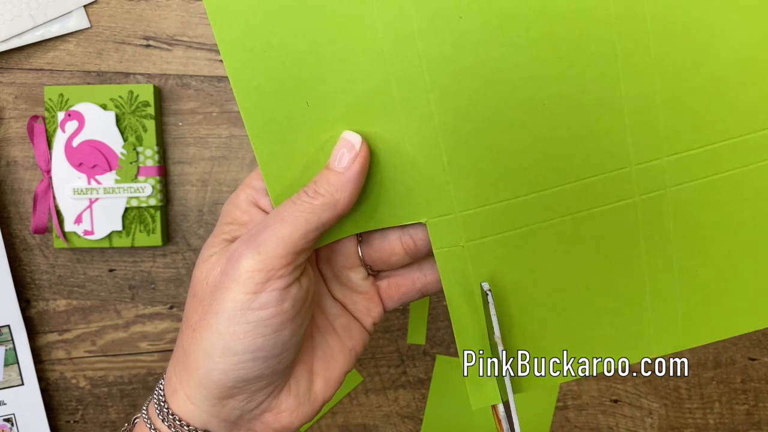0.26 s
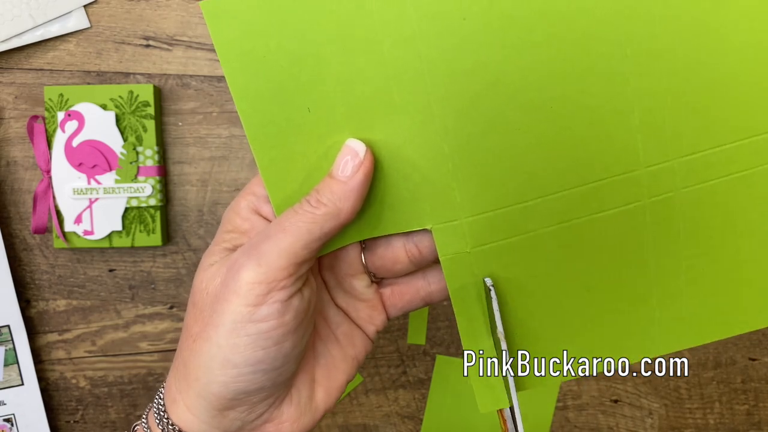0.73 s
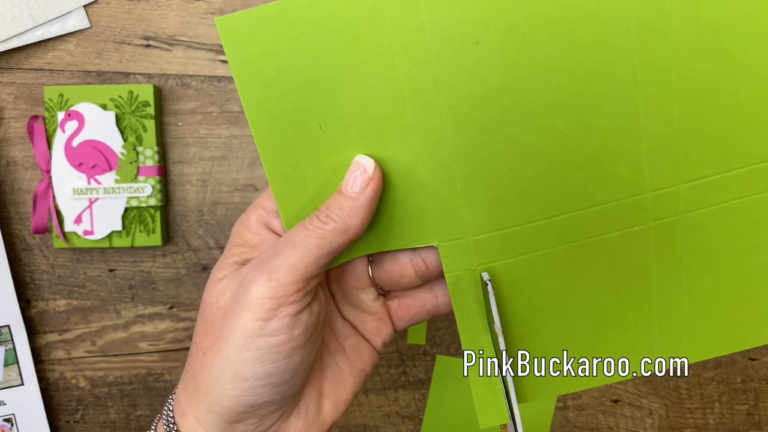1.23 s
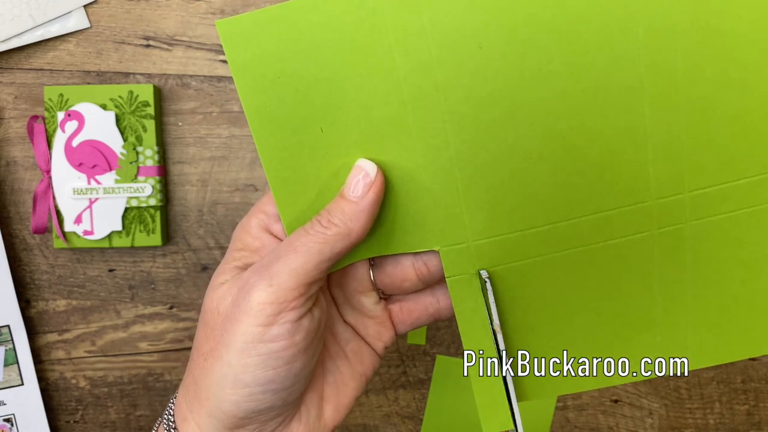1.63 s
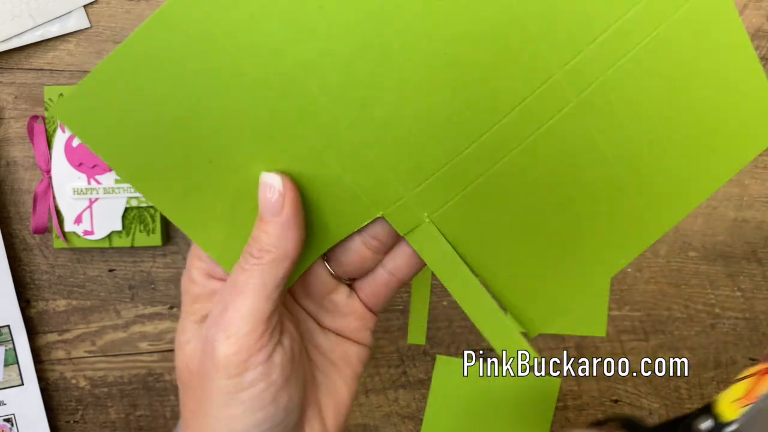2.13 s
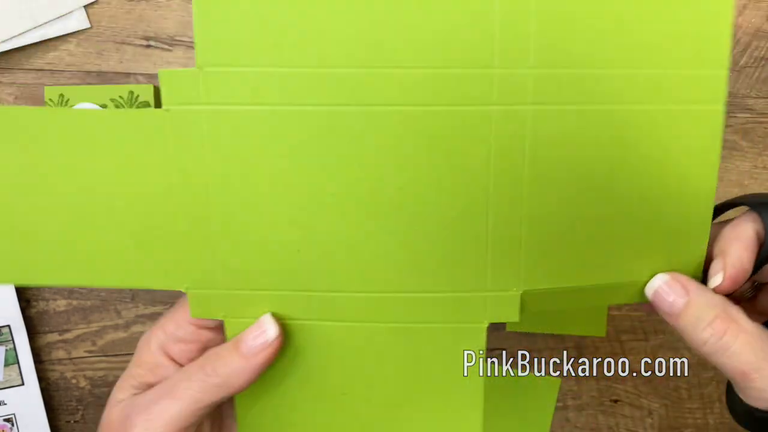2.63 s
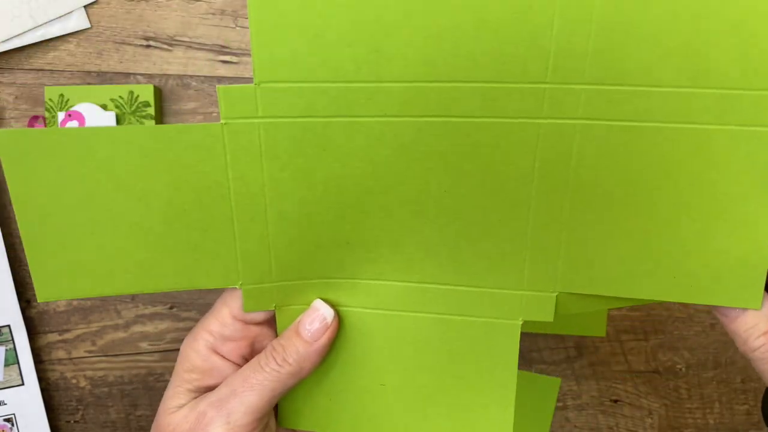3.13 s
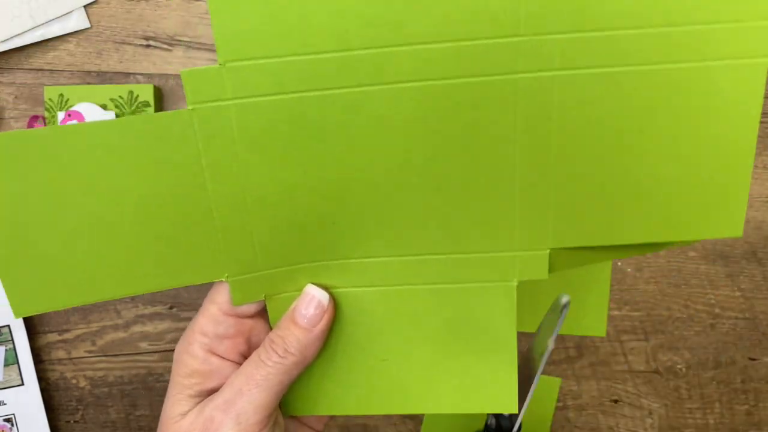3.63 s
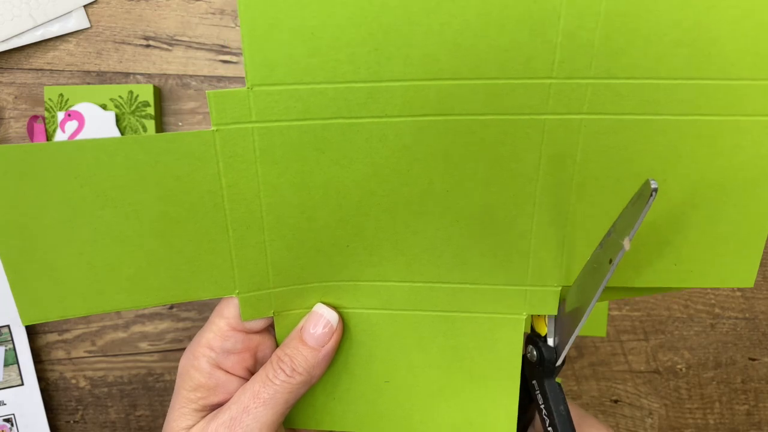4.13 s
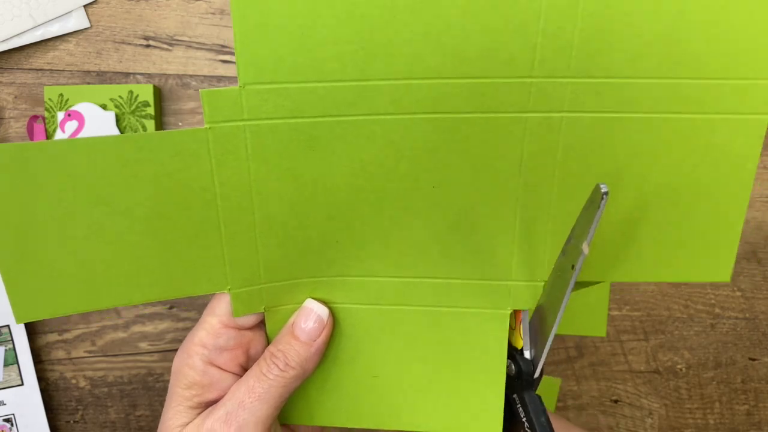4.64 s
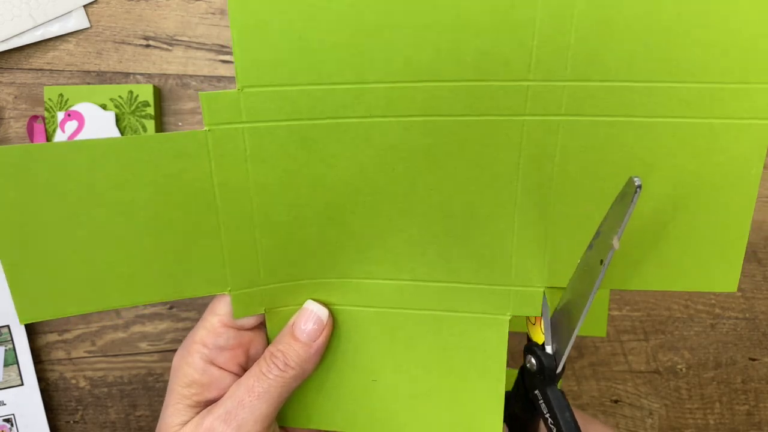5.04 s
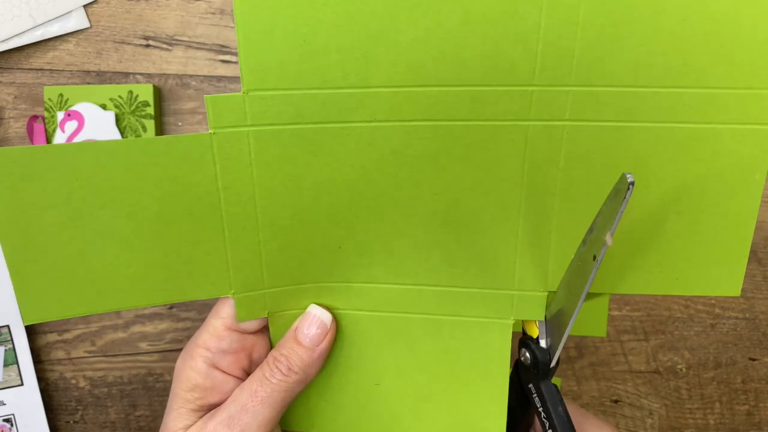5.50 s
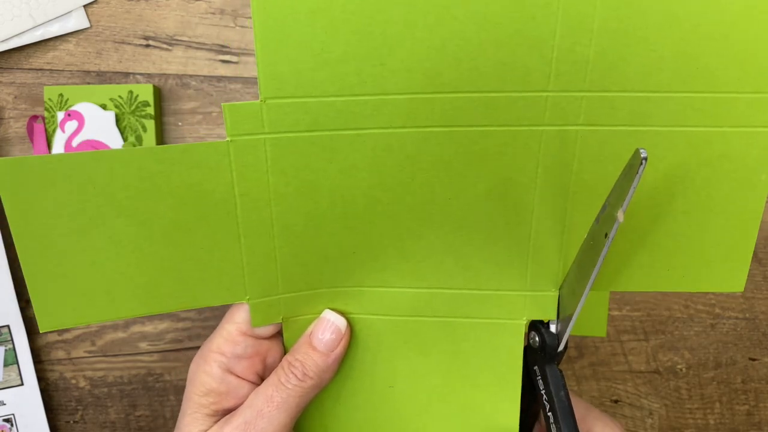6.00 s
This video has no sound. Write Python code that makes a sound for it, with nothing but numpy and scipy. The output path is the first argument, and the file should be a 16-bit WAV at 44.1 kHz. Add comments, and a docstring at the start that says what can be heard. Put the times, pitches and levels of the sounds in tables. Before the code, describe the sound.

Scissors crunch through stiff card in short uneven snips, then the sheet is turned with hollow flexing pops, followed by soft scuffs and small creaky buckles.

```python
"""Scissors snip through stiff cardstock close under the microphones, at a craft table.
Each slip of the blades is a burst of snapping-fibre noise that also excites the sheet's resonances.
Blades and fingers rub over the card as grainy noise that catches and frees; judder and squeaks are tones.
The sheet sways as low noise and pops as it buckles: a kink runs through it, treble ahead of bass.
A small room answers faintly with short noise tails over a quiet room tone."""
import sys
import numpy as np
from scipy import signal
from scipy.fft import rfft, irfft, next_fast_len
from scipy.io import wavfile
from scipy.ndimage import uniform_filter1d, map_coordinates

SR = 44100
rng = np.random.default_rng(int(sys.argv[2]) if len(sys.argv) > 2 else 0)


def bounce(signal):
    """Save signal as a 16-bit WAV file at the path given by the first command-line argument."""
    frames = np.transpose(np.atleast_2d(signal))
    limited = np.clip(frames, -1, 1)
    pcm = np.round(limited * 32767).astype(np.int16)
    wavfile.write(sys.argv[1], SR, pcm)


N = 276242
T = np.arange(N) / SR

# the sheet buckles: (time [s], drum note level [dB], drum note [Hz],
# then relative to the note: flap [dB], snap [dB], rasp [dB])
BUCKLES = [(1.48, -55.5, 383, -16, -4, -28), (2.355, -48.5, 383, -31, -5.5, -8),
           (2.653, -33.5, 167, -11, -9.5, -9.5), (2.682, -39, 406, -34, -6.5, -11),
           (2.779, -47.5, 470, -5, -1, -7.5), (2.87, -33, 332.7, -36, -30, -35),
           (2.8825, -22.5, 368.5, -45, -13, -35), (2.899, -30.5, 448, -24, -24, -24.5),
           (2.952, -33, 373, -29.5, -15.5, -33), (4.0542, -42, 308, -29, -10.5, -21),
           (4.266, -43, 237, -24, -5, -20), (4.3342, -45, 382, -34, -1, -10.5),
           (4.378, -48, 285, -27, -10.5, -30), (4.569, -40.5, 443, -38, -5.5, -17.5),
           (4.636, -33, 430, -9.5, -7.5, -18.5), (4.701, -49, 360, -19, 2.5, -2),
           (4.784, -34, 327, -25.5, -19, -18), (4.947, -39.5, 540, -33.5, 0, -8),
           (5, -41.5, 433, -19, -11, -17), (5.028, -46.5, 369, -8, -10, -19),
           (5.388, -49.5, 320, -32, -19, -40), (5.402, -43.5, 360, -36, -9.5, -16),
           (5.525, -36.5, 400, -9, -7, -16.5), (5.61, -45.5, 277, -16, -8, -16.5),
           (5.647, -40, 314, -23, -12.5, -13), (6.033, -52, 414, -34, -3, -5.5)]


def amp(db):
    """Decibels to gain."""
    return 10 ** (np.asarray(db) / 20)


def unit(x):
    """Scaled to rms 1."""
    return x / np.sqrt(np.mean(x ** 2) + 1e-20)


def along(points, hz):
    """(frequency [Hz], value) points read on a log frequency axis."""
    f, v = np.transpose(points)
    return np.interp(np.log(hz + 1), np.log(f + 1), v)


def gains(rows):
    """A gain per sample for each dB column, practically silent outside the rows."""
    times, *columns = np.transpose(rows)
    return [amp(np.interp(T, times, column, left=-140, right=-140)) for column in columns]


def wobble(rate):
    """A random curve of straight segments, rate knots a second."""
    knots = rng.standard_normal(int(N * rate / SR) + 4)
    return map_coordinates(knots, [T * rate], order=1)


def filtered(x, response):
    """x times a response given as a function of frequency."""
    m = next_fast_len(N + SR // 2)
    spectrum = rfft(x, m) * response(np.fft.rfftfreq(m, 1 / SR))
    return irfft(spectrum, m)[..., :N]


def colour(x, points, size=4096):
    """x through a causal filter of unit power with the given (frequency [Hz], level [dB]) shape."""
    cepstrum = irfft(np.log(amp(along(points, np.fft.rfftfreq(size, 1 / SR)))))
    # folding the cepstrum forward gives minimum phase
    cepstrum[1:size // 2] *= 2
    cepstrum[size // 2 + 1:] = 0
    kernel = irfft(np.exp(rfft(cepstrum)))
    return signal.fftconvolve(x, kernel / np.linalg.norm(kernel))[:len(x)]


def resonate(x, modes, size=8192):
    """x through (frequency [Hz], width [Hz], level [dB]) resonances of unit total power."""
    f = np.fft.rfftfreq(size, 1 / SR)
    total = 0
    for k, (centre, width, db) in enumerate(modes):
        resonance = 1j * f * width / (centre * centre - f * f + 1j * f * width)
        total = total + (-1) ** k * amp(db) * resonance
    # rolls off above twice the last mode
    kernel = irfft(total / (1 + .5j * f / modes[-1][0]))
    return signal.fftconvolve(x, kernel / np.linalg.norm(kernel))[:len(x)]


def add(track, s, sound):
    """Mix a sound in at time s."""
    part = track[max(round(s * SR), 0):][:len(sound)]
    part += sound[:len(part)]


def grains(rate, smooth):
    """Tiny fibre snaps, rate a second, over a share of even friction noise."""
    snaps = (rng.random(N) < rate / SR) * rng.uniform(-0.96, 1, N)
    return unit(unit(snaps) + smooth * rng.standard_normal(N))


def bursts(rows, rise, fall):
    """An envelope that swells up around each row's time, holds for its length and dies away."""
    envelope, t = np.zeros(N), np.arange(SR // 8) / SR
    for s, db, length in rows:
        swell = 1 - np.exp(-t / rise)
        decay = np.exp(-np.maximum(t - length, 0) / fall)
        add(envelope, s - rise, amp(db) * swell * decay)
    return envelope


def arch(length):
    """One hand movement: it gathers speed, slows and runs out."""
    roundness, lean, tail_s = 0.86, 0.78, 0.008  # a lean under 1 puts the peak early
    u = np.arange(round(length * SR) + SR // 8) / (length * SR)
    speed = abs(np.sin(np.pi * u ** lean)) ** roundness * (u < 1)
    keep = np.exp(-1 / (tail_s * SR))
    return np.maximum(speed, signal.lfilter([1 - keep], [1, -keep], speed))


def movements(rows):
    """The envelopes of a low and a high layer, driven by the same hand movements."""
    power = np.zeros((2, N))
    for start, end, *levels_db in rows:
        speed = arch(max(end - start, .01))
        for layer, db in zip(power, levels_db):
            add(layer, start, (amp(db) * speed) ** 2)
    return np.sqrt(power)


def speckle(x, depth_db, size=512, count=7):
    """The bending sheet favours different narrow bands, each for about count half-overlapping frames."""
    z = signal.stft(x, nperseg=size)[2]
    across_bands = uniform_filter1d(rng.standard_normal(z.shape), 4, 0)
    field = unit(uniform_filter1d(across_bands, count, 1))
    gain = amp(depth_db * np.clip(field, -2, 2))
    return signal.istft(z * unit(gain), nperseg=size)[1][:N]


def room_tone():
    """The quiet place itself: steady noise, independent in mid and side."""
    # spectrum of the room tone: (frequency [Hz], level [dB])
    quiet = [(20, -27.5), (55, 0), (110, -8.5), (300, -24.5), (1000, -32), (2000, -33.5), (6000, -37.5),
             (10000, -48), (16000, -64.5)]
    return amp(-73) * np.array([colour(rng.standard_normal(N), quiet) for _ in range(2)])


def swaying():
    """The large sheet pushes air and flutters low: it trembles in the hand, is swung, shakes after pops."""
    # how much the held sheet trembles: (time [s], level [dB])
    tremble_curve = [(0, -68.5), (.3, -73.5), (.7, -70), (1.42, -77.5), (1.6, -67), (1.88, -78), (2.3, -68),
                     (2.8, -57), (3.25, -72.5), (3.7, -85), (4.1, -75.5), (4.8, -66), (5.15, -77),
                     (5.32, -78), (5.55, -64), (5.8, -75.5), (6.26, -75)]
    # the hands swing the sheet: (start [s], end [s], air push level [dB], flutter level [dB])
    swings = [(.41, .72, -60, -86), (.79, .95, -82, -69), (.95, 1.07, -60.5, -63), (1.15, 1.28, -59, -72),
              (1.96, 2.1, -54.5, -66), (2.36, 2.45, -64, -54.5), (2.54, 2.63, -49, -66),
              (2.66, 2.725, -43, -48.5), (2.77, 2.84, -52.5, -52), (2.885, 3.0, -49, -49),
              (3.01, 3.075, -53.5, -72), (4.24, 4.5, -62.5, -62.5), (4.58, 4.68, -58, -60),
              (4.96, 5.04, -51.5, -49.5), (5.085, 5.14, -69, -63), (5.385, 5.5, -70, -56.5)]
    # spectrum of the pushed air: (frequency [Hz], level [dB])
    push_shape = [(15, -43), (30, -21), (50, -5), (68, 3.5), (90, -4), (120, -4), (200, -18), (350, -68.5),
                  (700, -83.5)]
    # spectrum of the flutter: (frequency [Hz], level [dB])
    flutter_shape = [(60, -23), (105, 2), (140, 0.5), (200, -5.5), (290, -1), (400, 2.5), (500, -6),
                     (670, -16.5), (900, -20), (1300, -39), (2500, -100)]
    wobble_db, tremble_push_db, tremble_flutter_db = 2, 2, -2.5
    shake_db, shake_s = -14, 0.034  # flutter that each pop leaves behind, and its decay
    tremble = amp(np.interp(T, *np.transpose(tremble_curve)) + wobble_db * wobble(9.1))
    swing_push, swing_flutter = movements(swings)
    kicks = np.zeros(N)
    for s, level_db, *_ in BUCKLES:
        add(kicks, s, amp([level_db + shake_db]))
    shake = signal.lfilter([1], [1, -np.exp(-1 / (shake_s * SR))], kicks)
    # independent causes add as powers
    push = np.hypot(amp(tremble_push_db) * tremble, swing_push)
    flutter = np.sqrt((amp(tremble_flutter_db) * tremble) ** 2 + swing_flutter ** 2 + shake ** 2)
    air = push * colour(rng.standard_normal(N), push_shape)
    flutters = flutter * colour(rng.standard_normal(N), flutter_shape)
    return amp(2.5) * air + amp(-1.0) * flutters


def rubbing(strokes, hiss_shape, rasp_db, hiss_db, catch_db, snaps):
    """Sliding over the card's grain; the contact catches and frees many times a second."""
    # spectrum of the low rasp: (frequency [Hz], level [dB])
    rasp_shape = [(320, -1.5), (550, -2.5), (675, -10.5), (849, -7), (1220, 2), (1440, -5.5), (1610, -8),
                  (2200, -6), (2520, -3.5), (3250, -10.5), (3600, -18.5), (3820, -9), (4200, -11.5),
                  (5460, -24.5), (9240, -120)]
    rasp, hiss = movements(strokes)
    catch = unit(amp(catch_db * wobble(130)))
    low = colour(rasp * catch * grains(rate=snaps, smooth=1.0), rasp_shape)
    high = colour(hiss * catch * grains(rate=2 * snaps, smooth=0.34), hiss_shape)
    return amp(rasp_db) * low + amp(hiss_db) * high


def creeping():
    """The sheet creeps along a resting blade: sparse grains with a dull hiss."""
    # creeping movements: (start [s], end [s], rasp level [dB], hiss level [dB])
    creeps = [(0, .3, -66, -72.5), (.46, .71, -63.5, -84), (4.2, 4.48, -71, -90), (4.56, 4.93, -60.5, -69),
              (4.88, 5.2, -55.5, -65.5), (5.36, 5.59, -71, -78), (5.58, 5.75, -63, -80),
              (5.75, 6.3, -77.5, -90)]
    # spectrum of the hiss: (frequency [Hz], level [dB])
    dull_hiss = [(1940, -23), (3300, -37), (4210, -1.5), (5210, 1.5), (6180, 1), (9310, -19), (11300, -30),
                 (13000, -36), (16000, -57)]
    return rubbing(creeps, dull_hiss, rasp_db=-2.0, hiss_db=-2.0, catch_db=2.5, snaps=700)


def inching():
    """Faint, uneven slips as the blades first inch forward: (time [s], level [dB], length [s])."""
    start_s, end_s, slips_per_s = 0.013, 0.3, 63
    slip_db, scatter_db, slip_s = -60.5, 2.5, 0.009
    jitter = .25  # timing scatter, in slip intervals
    draws = rng.standard_normal((40, 2))
    times = start_s + (np.arange(len(draws)) + jitter * draws[:, 0]) / slips_per_s
    return [(s, slip_db + scatter_db * d, slip_s) for s, d in zip(times, draws[:, 1]) if s < end_s]


def cutting():
    """Each slip of the blades breaks a cluster of fibres, which also shakes the sheet."""
    # the card gives way between the blades: (time [s], level [dB], length [s])
    tears = [(.077, -49.5, 0.0068), (.124, -50.5, 0.0077), (.163, -56, 0.0056), (.220, -58, 0.0056),
             (.335, -53, 0.016), (.368, -55.5, 0.027), (.412, -53.5, 0.022), (.437, -49, 0.016),
             (.493, -49, .006), (.507, -43, 0.0071), (.536, -47.5, .015), (.568, -42, 0.011),
             (.606, -43.5, 0.0062), (.623, -45.5, 0.012), (.655, -48, 0.012), (1.088, -42, 0.016),
             (1.119, -37.5, .009), (1.143, -46.5, 0.0056), (1.156, -42, 0.0095), (1.334, -60, 0.0127),
             (1.528, -38.5, 0.0055), (1.538, -48, 0.0097), (1.550, -43, 0.0093), (1.575, -42.5, 0.011),
             (1.591, -47, 0.031), (1.632, -47, 0.0021), (1.698, -49, 0.0045), (1.729, -49, .004),
             (1.737, -42, 0.021), (2.127, -43, 0.0068)]
    # how much of the tearing the sheet takes up: (time [s], ring [dB], boom [dB], fibre crackle [dB])
    coupling = [(0, -9.5, -14, -6.5), (.45, -15.5, -21.5, -6.5), (.6, -6.5, -14, -2),
                (1.12, -6.5, -11.5, -6), (1.54, -3.5, -10, -2.5), (1.6, -4.5, -1.5, 3), (1.75, -8, -3.5, 1),
                (2.13, -8, -11, -4), (2.2, -9, 10, -8)]
    # spectrum of the snapping fibres: (frequency [Hz], level [dB])
    fibre_shape = [(500, 1.5), (1000, -6.5), (2300, -1), (2800, -1), (3600, 0), (4400, 4.5), (5200, -2.5),
                   (7000, 1.5), (8300, -2.5), (10200, -5.5), (11500, -15.5), (13500, -24), (16000, -24)]
    # higher resonances of the card: (frequency [Hz], width [Hz], level [dB])
    ring_modes = [(993, 500, -9), (1250, 160, 1), (1420, 220, -7), (1693, 220, -6.5)]
    # lower resonances of the card: (frequency [Hz], width [Hz], level [dB])
    boom_modes = [(140, 45, -13.5), (235, 15, 0), (302.3, 21, 5), (354, 112, -0.5), (470, 162, -5.5)]
    force = bursts(tears + inching(), rise=.0015, fall=.003)
    ring, boom, crackle = gains(coupling)
    # stray fibres give way just before and after each main slip
    strain = abs(uniform_filter1d(force, size=SR // 40))
    strays = amp(-7.5) * strain * grains(rate=600, smooth=0.071)
    breaks = force * grains(rate=5000, smooth=0.56) + strays
    fibres = speckle(colour(breaks * crackle, fibre_shape), depth_db=2, size=256)
    ringing = resonate(breaks * ring, ring_modes)
    booming = resonate(breaks * boom, boom_modes)
    return amp(-3.5) * fibres + amp(4.0) * ringing + amp(4) * booming


def sliding():
    """Blades and fingers slide over the card: dense grains with a bright hiss."""
    # sliding movements: (start [s], end [s], rasp level [dB], hiss level [dB])
    slides = [(.72, .96, -64, -66.5), (.78, .945, -52.5, -52.5), (1.9, 1.945, -55, -65),
              (1.915, 1.985, -42.5, -53), (1.955, 2.04, -47.5, -48), (2.025, 2.06, -48, -46.5),
              (2.04, 2.32, -65, -65.5), (2.33, 2.48, -52.5, -55.5), (2.38, 2.43, -47.5, -44),
              (2.455, 2.505, -56, -50), (2.5, 2.66, -53.5, -50.5), (2.725, 2.805, -54.5, -57),
              (2.82, 2.92, -56.5, -62), (2.933, 2.962, -45.5, -52), (2.96, 3.08, -66, -74),
              (3.11, 3.21, -66.5, -71.5), (3.23, 3.285, -52.5, -69.5), (3.26, 3.34, -81, -74),
              (3.455, 3.53, -82, -67), (3.862, 3.9, -62, -71), (3.88, 3.955, -62, -81.5)]
    # spectrum of the hiss: (frequency [Hz], level [dB])
    bright_hiss = [(1940, -24.5), (3300, 0), (3600, -1.5), (3870, -7.5), (4130, -4), (4440, 3.5),
                   (4750, -2), (6140, 5), (7740, -4.5), (10300, -7.5), (11300, -16.5), (11800, -52.5),
                   (16000, -62.5)]
    return rubbing(slides, bright_hiss, rasp_db=-1.5, hiss_db=-4.0, catch_db=3.0, snaps=1600)


def scuffing():
    """The card's edge or a blade drags briefly across the steel."""
    # short scuffs on a blade: (time [s], level [dB], length [s])
    scuffs = [(.978, -62.5, 0.015), (2.284, -54, 0.0034), (2.306, -55, 0.0037), (4.079, -66, 0.013),
              (4.213, -63.5, 0.0049), (4.433, -62, 0.02), (4.506, -65, 0.0053), (4.585, -57.5, 0.018),
              (4.620, -55.5, 0.024), (4.736, -49.5, 0.052), (4.911, -52.5, 0.024), (5.15, -57.5, 0.033),
              (5.335, -63.5, 0.019), (5.44, -58, 0.075), (5.668, -57.5, 0.012), (6.003, -62.5, 0.021),
              (6.145, -64.5, 0.015)]
    # spectrum of a scuff: (frequency [Hz], level [dB])
    scuff_shape = [(350, -6), (550, 13), (780, 5), (1250, 19), (1750, 6.5), (2350, 14), (3200, 6.5),
                   (3900, -1.5), (4600, 0), (6500, -4), (7600, -11.5), (10200, -15.5), (11500, -58),
                   (16000, -47)]
    drag = bursts(scuffs, rise=0.0038, fall=0.0098)
    return amp(-0.5) * colour(drag * grains(rate=4600, smooth=1.0), scuff_shape)


def ticking():
    """The blades touch with a tiny bright click of decaying noise."""
    # light touches of the steel blades: (time [s], level [dB])
    touches = [(1.0766, -46), (1.3229, -47), (2.129, -52), (2.3206, -46), (2.346, -38.5), (2.81, -48),
               (3.1268, -44.5), (3.3772, -49)]
    track, t = np.zeros(N), np.arange(SR // 30) / SR
    for s, db in touches:
        add(track, s, amp(db - 13) * np.exp(-t / 0.0016) * rng.standard_normal(len(t)))
    steel = [(800, -23), (3000, -5.0), (7000, -4.5), (10000, -10), (13000, -18.0), (16000, -18.5)]
    return colour(track, steel)


def bending_wave(spread, echo_db, t60_low, t60_high, size=8192, count=22):
    """A kink runs through the sheet, treble ahead of bass, and returns from the edges; energy 1."""
    f = np.fft.rfftfreq(size, 1 / SR)
    late = (np.arange(count)[:, None] + rng.uniform(0.507, 1.444, (count, 1))) * 0.0032  # s
    t60 = along([(300, t60_low), (4000, t60_high)], f)
    # bending waves travel at a speed that grows with the root of frequency: delay is spread / sqrt(f)
    sweep = np.exp(-4j * np.pi * spread * np.sqrt(f) * (1 + late / .02))
    signs = rng.choice([-1, 1], (count, 1))
    returns = signs * amp(echo_db - 60 * late / t60) * sweep * np.exp(-2j * np.pi * f * late)
    wave = irfft(np.exp(-4j * np.pi * spread * np.sqrt(f)) + returns.sum(0))
    return wave / np.linalg.norm(wave)


def buckling():
    """The sheet flips shape: crack and rasp at the kink, falling snap, ringing drum note, flap of air."""
    # spectrum of the flap of air: (frequency [Hz], level [dB])
    flap_shape = [(25, -56.5), (65, -16.5), (90, -11), (135, 9), (300, -43), (900, -65)]
    # spectrum of the snap: (frequency [Hz], level [dB])
    snap_shape = [(400, -20.5), (750, 13), (1200, 16), (1450, 4.5), (1800, -18), (3000, -51.5)]
    # spectrum of the rasp at the kink: (frequency [Hz], level [dB])
    kink_shape = [(1000, -20.5), (1700, 3), (2450, 7), (3200, -12.5), (5000, -51)]
    # spectrum of the crack: (frequency [Hz], level [dB])
    crack_shape = [(2000, -18.5), (3500, 6.5), (4400, 2), (6300, 5.5), (8000, -11.5), (10500, -13),
                   (12500, -30), (16000, -26)]
    # resonances of the whole sheet: (frequency [Hz], width [Hz], level [dB])
    sheet_modes = [(283.4, 12, -6), (389, 11, -0.5), (456, 19, -8), (546, 41, -12.5), (663, 110, -18.5)]
    pop_db, ringing_db = 24.5, 23  # strength of a pop and of the sheet's ringing after it
    hard_db, ringing_grows = -28.5, 0.68  # below a hard flip the ringing falls away (dB per dB)
    # edge echoes grow (dB per dB) in the stronger flips
    base_echo_db, echo_from_db, echo_grows = -4, -35.5, 0.98
    # crack over rasp: while the sheet is turned, and while the blades hold it
    turn_start_s, turn_end_s, crack_free_db, crack_held_db = 2.2, 3.1, -0.5, -9.5
    track, ringing = np.zeros(N), np.zeros(N)
    for s, level_db, drum_hz, flap_db, snap_db, rasp_db in BUCKLES:
        echo_db = base_echo_db + echo_grows * max(level_db - echo_from_db, 0)
        turned = turn_start_s < s < turn_end_s
        crack_db = rasp_db + (crack_free_db if turned else crack_held_db)
        wave = bending_wave(spread=.09, echo_db=echo_db, t60_low=0.086, t60_high=0.021)
        t = np.arange(len(wave)) / SR
        crease = rng.standard_normal(len(t)) * np.exp(-t / 0.015) * (1 - np.exp(-t / .001))
        drum_shape = [(25, -50), (80, -24), (drum_hz * 0.45, -8), (drum_hz, 0),
                      (drum_hz * 1.205, -3), (drum_hz * 2.12, -16), (2500, -50), (6000, -80)]
        drum = colour(wave, drum_shape)
        parts = [(flap_db, colour(wave, flap_shape)), (snap_db, colour(wave, snap_shape)),
                 (rasp_db, colour(wave, kink_shape)), (crack_db, colour(crease, crack_shape))]
        pop = drum / np.linalg.norm(drum)
        for db, part in parts:
            pop = pop + amp(db) * part / np.linalg.norm(part)
        add(track, s, amp(level_db + pop_db) * pop)
        # the whole sheet rings fully only after a hard flip
        softness_db = min(level_db - hard_db, 0)
        add(ringing, s + 0.00404, amp([level_db + ringing_db + ringing_grows * softness_db]))
    return track + resonate(ringing, sheet_modes)


def stick_slip(rows, pitch_hz, waver):
    """A brief unsteady tone from a contact that grips and lets go."""
    phase = 2 * np.pi * np.cumsum(pitch_hz * (1 + waver * wobble(240))) / SR
    tone = np.sqrt(2) * np.sin(phase)
    return bursts(rows, rise=0.0017, fall=0.0077) * tone * amp(4.9 * wobble(120))


def juddering():
    """The cut strip judders along the blade as it is pulled free."""
    # judders: (time [s], level [dB], length [s])
    judders = [(1.989, -41.5, 0.025)]
    return stick_slip(judders, pitch_hz=439, waver=0.04)


def squeaking():
    """The blades squeak against each other in a high stick-slip tone."""
    # squeaks: (time [s], level [dB], length [s])
    squeaks = [(2.283, -59, .002), (2.304, -64, .002)]
    return stick_slip(squeaks, pitch_hz=2750, waver=.025)


def gliding():
    """The blades glide against each other, smooth steel on steel, in a fine, bright hiss."""
    # the flat of one blade glides along the other: (time [s], level [dB], length [s])
    glides = [(4.745, -52, 0.041), (4.93, -77.5, .17), (5.465, -57, 0.031), (5.612, -64.5, .012),
              (6.15, -65.5, 0.013)]
    # spectrum of the glide: (frequency [Hz], level [dB])
    glide_shape = [(2500, -32), (4200, -2.5), (5100, -14.5), (5550, -3.5), (6150, -1.5), (7000, -10),
                   (8200, -12), (10000, -11.5), (11500, -33.5), (16000, -33)]
    slide = bursts(glides, rise=0.011, fall=0.017)
    return amp(-3.5) * colour(slide * grains(rate=1700, smooth=0.31), glide_shape)


def ports(x, scatter):
    """Mid and side of a near sound: side is a quarter turn off, scattered in phase by the moving sheet."""
    z = signal.stft(x, nperseg=256)[2]
    across_bands = uniform_filter1d(rng.standard_normal((2,) + z.shape), 5, 1)
    real, imaginary = uniform_filter1d(across_bands, 24, 2)
    turn = 1j + scatter * (unit(real) + 1j * unit(imaginary))
    return np.array([x, signal.istft(z * turn / abs(turn), nperseg=256)[1][:N]])


def room(x, count=12):
    """Mid and side of the walls' answer: decaying noise, new for each of count equal stretches."""
    # decay of the small room: (frequency [Hz], time to fall 60 dB [s])
    decay = [(100, 0.73), (400, 0.15), (2000, 0.23), (6000, 0.25), (14000, 0.065)]
    wet = np.zeros((2, N))
    for k, piece in enumerate(np.array_split(x, count)):
        hz, t, z = signal.stft(rng.standard_normal((2, SR // 2)), SR, nperseg=256)
        fade = amp(-60 * t / along(decay, hz)[:, None]) * (1 - np.exp(-t / 0.0038))
        tails = signal.istft(z * fade, SR, nperseg=256)[1]
        for channel, tail in zip(wet, tails):
            answer = signal.fftconvolve(piece, tail / np.linalg.norm(tail))
            add(channel, k * N / count / SR, answer)
    return wet


def scene():
    """Scissors and sheet close by, in a quiet room."""
    # stereo width: (frequency [Hz], side gain [dB])
    width = [(60, -13.5), (150, -14), (380, -8), (700, 3.5), (1290, -11.5), (2400, -2.5), (4400, 2.5),
             (6500, -6), (8200, -1), (11000, 8.5), (14500, 20.5)]
    rubs = sliding() + creeping() + scuffing() + gliding()
    friction = speckle(rubs, depth_db=2.8, count=26)
    contact = cutting() + ticking() + friction + juddering() + squeaking()
    pops = buckling()
    # the whole sheet moves in a pop, so its low notes reach both ports nearly alike
    pop_mid, pop_side = ports(pops, scatter=.6)
    pop_side = filtered(pop_side, lambda hz: amp(along([(600, -9.0), (2000, -1)], hz)))
    direct = ports(contact + swaying(), scatter=0.9) + np.array([pop_mid, pop_side])
    walls = amp(-14.0) * room(contact + amp(-2.5) * pops)
    mid, side = direct + walls + room_tone()
    side = filtered(side, lambda hz: amp(along(width, hz)))
    return np.array([mid + side, mid - side])


def record(dry):
    """The microphones' band ends sharply at 16 kHz."""
    return filtered(dry, lambda hz: hz < 16000)


dry = scene()
out = record(dry)
bounce(out)
```